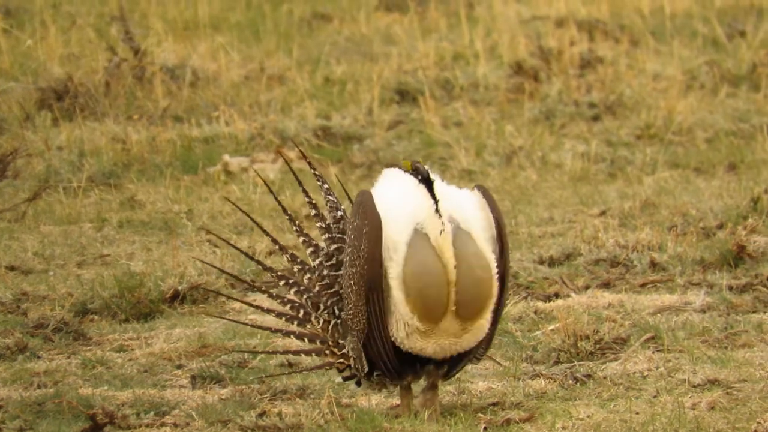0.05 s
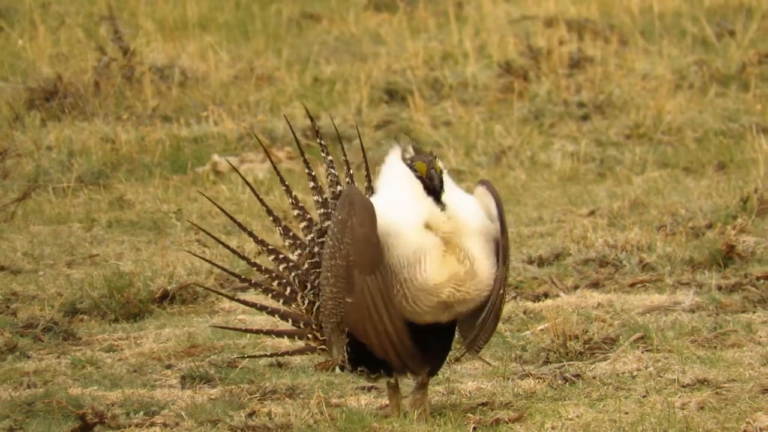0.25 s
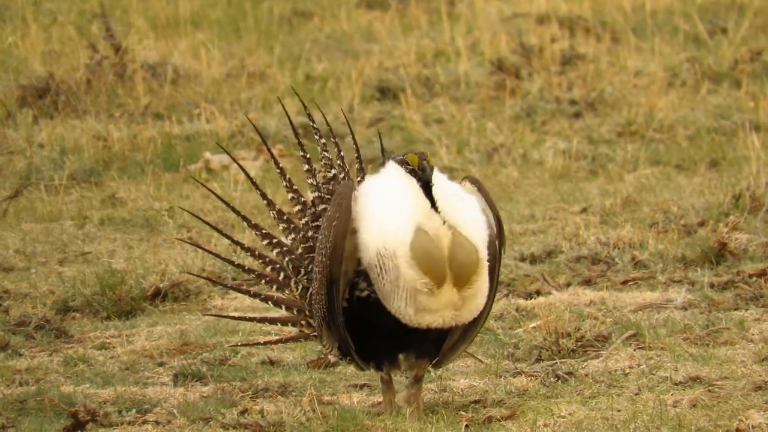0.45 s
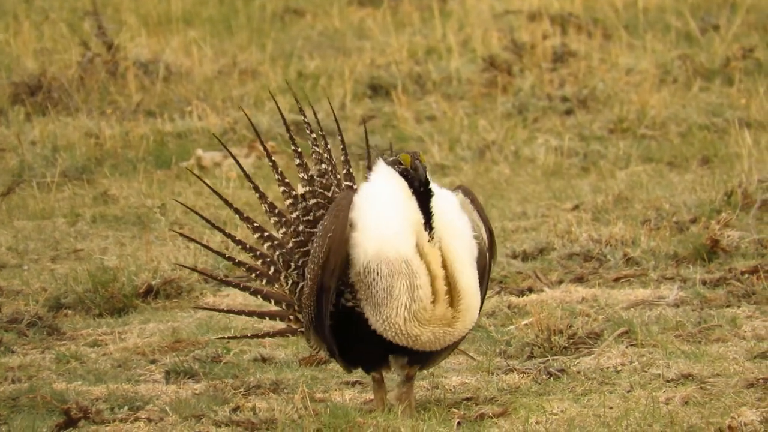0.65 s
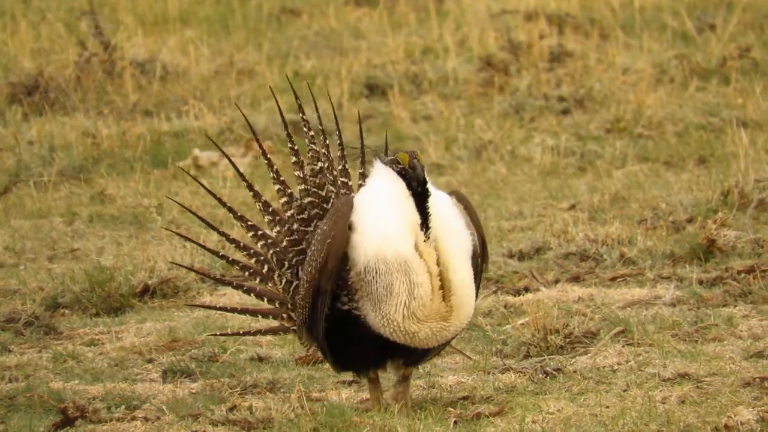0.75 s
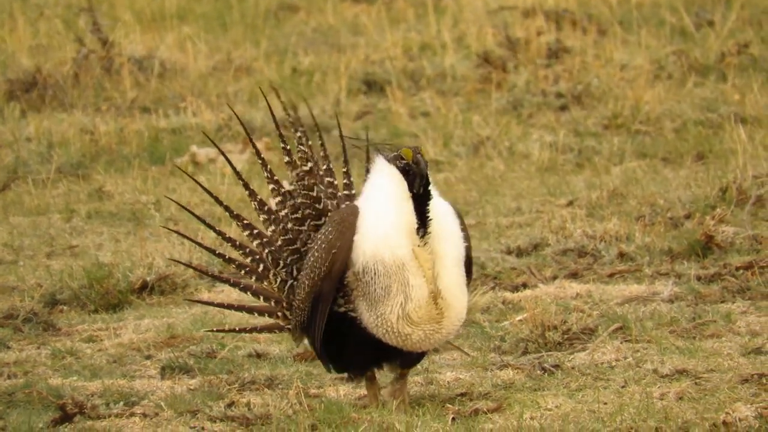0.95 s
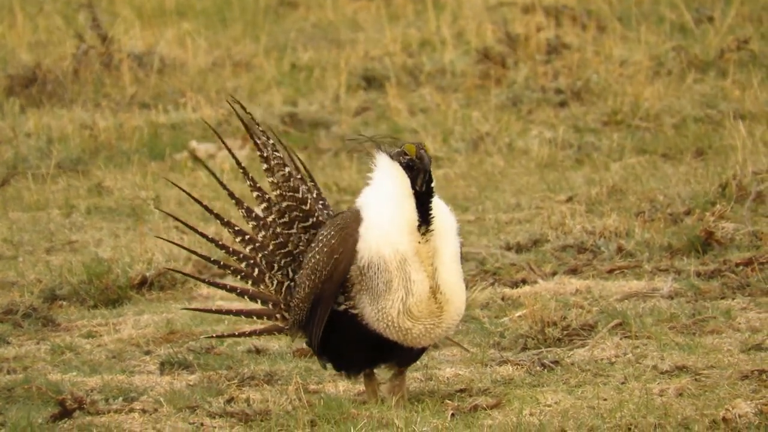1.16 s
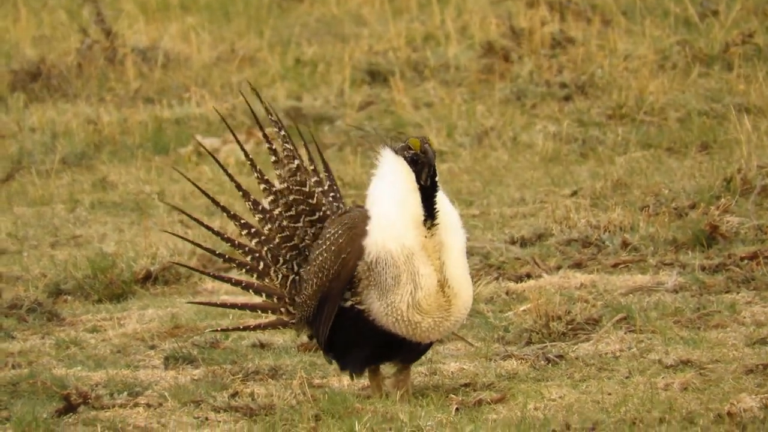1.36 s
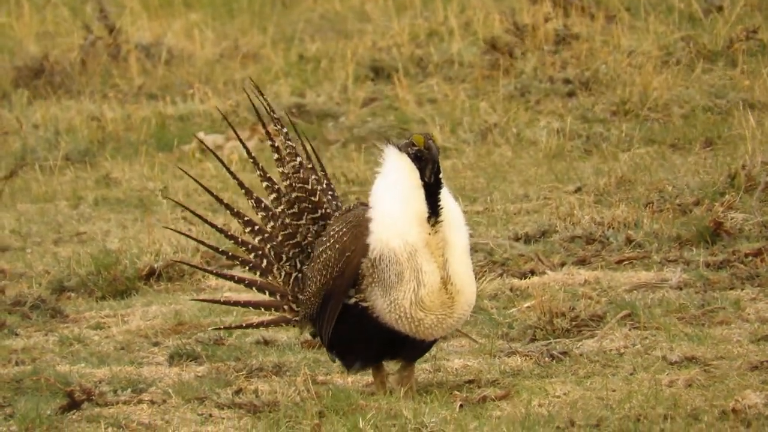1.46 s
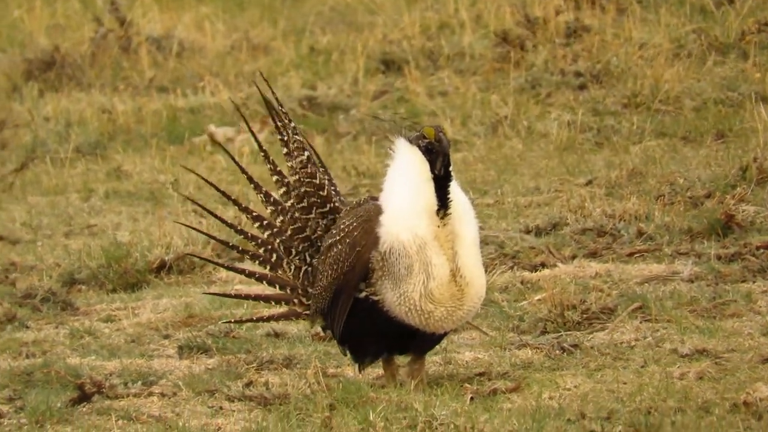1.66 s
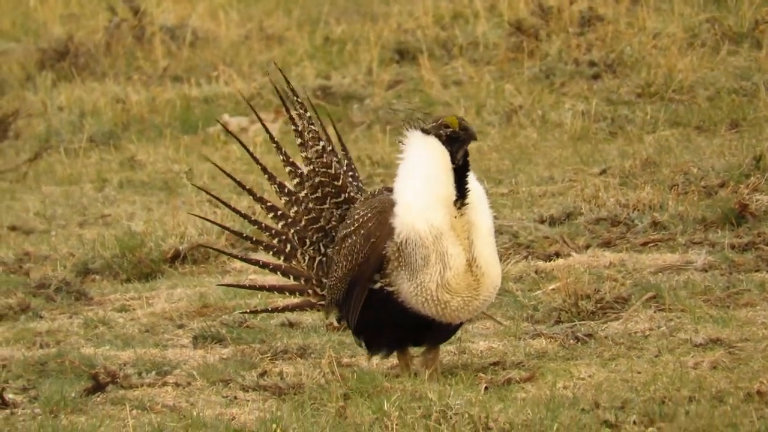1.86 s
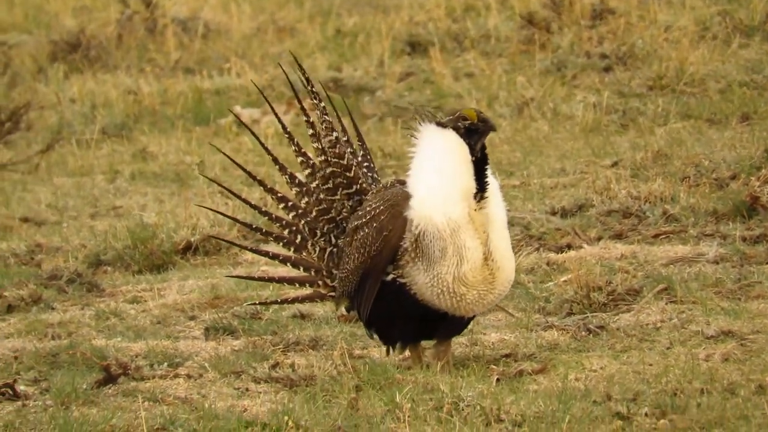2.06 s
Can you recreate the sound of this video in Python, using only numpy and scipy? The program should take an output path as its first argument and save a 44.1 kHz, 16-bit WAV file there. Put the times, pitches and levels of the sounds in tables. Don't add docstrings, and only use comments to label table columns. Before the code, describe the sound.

Wind buffets a small stereo microphone in low, muffled thumps: strong near 0.35 seconds, again around 0.6, roughest with raspy flutter near 1.05, a lull around 1.4 to 1.55, then more gusts at 1.65 and 1.8. Faint distant grouse pops come at 0.02 and 0.22; the near bird pops sharply at 0.44, whistles thinly at 0.5, pops weakly at 0.65. A dry stalk ticks at 1.37 over soft hiss.

```python
import sys
import numpy as np
from scipy import signal
from scipy.fft import rfft, irfft, next_fast_len
from scipy.io import wavfile
from scipy.ndimage import uniform_filter1d

SR = 44100
rng = np.random.default_rng(int(sys.argv[2]) if len(sys.argv) > 2 else 0)


def nominal_scale(level):
    x = np.asarray(level, float) / 20
    return 10 ** x


def store_wav(level_fs):
    pcm = np.round(np.clip(np.atleast_2d(level_fs), -1, 1) * 32767)
    wavfile.write(sys.argv[1], SR, pcm.T.astype(np.int16))


N = 92610


def unit(x):
    return x / np.sqrt(np.mean(x ** 2) + 1e-20)


def coloured(x, points):
    m = next_fast_len(N + 8192) // 2 * 2
    f_hz, level_db = np.transpose(list(points) + [(SR / 2, points[-1][1] - 40)])
    gain_db = np.interp(np.log(np.fft.rfftfreq(m, 1 / SR) + 1), np.log(f_hz), level_db)
    cepstrum = irfft(np.log(nominal_scale(gain_db)), m)
    cepstrum[1:m // 2] *= 2
    cepstrum[m // 2 + 1:] = 0
    return irfft(rfft(x, m) * np.exp(rfft(cepstrum)), m)[..., :N]


def smooth(x, length_s):
    size = max(int(length_s * SR / 2), 1)
    return np.abs(uniform_filter1d(uniform_filter1d(x, size), size))


def bell(s, db, ms):
    return nominal_scale(db) * 0.5 ** ((2000 * (np.arange(N) / SR - s) / ms) ** 2)


def air():
    # f/Hz, level/dB
    air_mid = [(25, -29.5), (70, -12), (200, -17), (500, -4.5), (1300, -12), (2500, -20), (9000, -33.5),
               (13800, -44.5)]
    # f/Hz, level/dB
    air_side = [(60, -38.5), (300, -34), (600, -11.5), (1200, -5), (2500, -3.5), (6000, -9.5), (11000, -19),
                (15000, -23)]
    # f/Hz, width/Hz, level/dB
    hum = [
        (934, 96, -61.5),
        (1618, 130, -69),
        (10370, 300, -85.5),
        (11200, 430, -88.5),
    ]
    air_db, side_db, patch_db = -56, -63.5, 1.62
    z = signal.stft(rng.standard_normal((3, N)), nperseg=512)[2]
    patches = uniform_filter1d(uniform_filter1d(rng.standard_normal(z.shape), 5, 1), 8, 2)
    a, b, c = signal.istft(z * nominal_scale(patch_db * unit(patches)), nperseg=512)[1][:, :N]
    f_hz = np.fft.rfftfreq(N, 1 / SR)
    mid = nominal_scale(air_db) * unit(coloured(a, air_mid))
    for hz, width_hz, db in hum:
        mid = mid + nominal_scale(db) * unit(irfft(rfft(c) * np.exp(-((f_hz - hz) / width_hz) ** 2), N))
    side = nominal_scale(side_db) * unit(coloured(b, air_side))
    return np.array([mid + side, mid - side])


def stalk():
    at_s, level_db, t60_s = 1.3735, -52, 0.02
    t = np.arange(N) / SR - at_s
    bright = [(1500, -17), (4500, 17.5), (8000, 11), (13000, -4)]  # f/Hz, level/dB
    noise = unit(coloured(rng.standard_normal((2, N)), bright))
    return (t > 0) * nominal_scale(level_db - 60 * np.abs(t) / t60_s) * noise


def whistle(later_s, gain_db):
    # t/s, f/Hz, level/dB
    glide = [
        (.482, 1420, -66),
        (.491, 1595, -61),
        (.501, 2010, -60),
        (.509, 2270, -58),
        (.517, 2300, -57),
        (.523, 2020, -56),
        (.531, 1650, -64),
    ]
    t = np.arange(N) / SR - later_s
    s, hz, db = np.transpose(glide)
    on = smooth(1.0 * (t > s[0]) * (t < s[-1]), 0.0049)
    level = np.sqrt(2) * nominal_scale(gain_db + np.interp(t, s, db))
    pitch_hz = smooth(np.interp(t, s, hz), 0.0042)
    return on * level * np.sin(2 * np.pi * np.cumsum(pitch_hz) / SR)


def pops():
    # t/s, peak/dB, snap spacing/ms, brightest f/Hz, left-right/dB
    sacs = [
        (.0218, -40.5, 1.52, 1037, 2),
        (.2215, -50, 0.55, 2470, -7),
        (0.4406, -26.5, 1.016, 2470, 0),
        (0.6481, -42.5, 0.52, 2400, -5),
    ]
    snap_loss_db = 3.5
    scatter_db, scatter_t60_s, scatter_after_s = -11, 0.03, 0.003
    sac_hz, sac_db, sac_t60_s, sac_late_s = 1124, -15, 0.018, 0.00296
    out, t = np.zeros((2, N)), np.arange(2000) / SR
    late = np.abs(t - sac_late_s)
    ring = (t > sac_late_s) * nominal_scale(sac_db - 60 * late / sac_t60_s) * np.sin(2 * np.pi * sac_hz * late)
    decay = nominal_scale(scatter_db - 60 * t / scatter_t60_s) * (t > scatter_after_s)
    for s, db, ms, hz, pan_db in sacs:
        snaps = 0
        for k in range(3):
            since = t - 0.0004 - k * ms / 1000
            pulse = np.exp(-(np.pi * hz * since / 1.5) ** 2) * np.sin(2 * np.pi * hz * since)
            snaps = snaps + nominal_scale(-snap_loss_db * k) * pulse
        scatter = rng.standard_normal(len(t)) + 0.47 * rng.standard_normal((2, len(t)))
        ground = decay * scatter * np.sqrt(hz / SR)
        echo = signal.fftconvolve(snaps[None], ground, axes=1)[:, :len(t)]
        pan = nominal_scale([[pan_db / 2], [-pan_db / 2]])
        out[:, round(s * SR):][:, :len(t)] += nominal_scale(db + 4.5) * pan * (snaps + echo + ring)
    return out


def flutters():
    # t/s, level/dB, length/ms, reach/Hz
    rasps = [(.252, -48.5, 45, 800), (0.333, -42, 27, 900), (0.354, -34.5, 25.7, 1100),
             (0.383, -44, 19, 900), (.565, -45.5, 13, 800), (0.648, -46, 42, 900), (0.797, -46.5, 27, 850),
             (0.943, -42.5, 15, 850), (1.022, -36, 21, 900), (1.053, -25.5, 13, 1560),
             (1.074, -29, 11.8, 1200), (1.138, -39.5, 33, 800), (1.524, -49.5, 25, 1000),
             (1.639, -49, 33, 900), (1.83, -41.5, 28, 1000)]
    low_hz, side_db = 485, -7
    grain_db, grain_s = 5.5, 0.0039
    f_hz, white = np.fft.rfftfreq(N, 1 / SR), rng.standard_normal((3, N))
    grain = unit(uniform_filter1d(white[2], int(grain_s * SR) + 1))
    spectrum = rfft(white[:2] * nominal_scale(grain_db * grain))
    out = 0
    for s, db, ms, reach_hz in rasps:
        cut = np.sqrt((1 + (low_hz / (f_hz + 1)) ** 6) * (1 + (f_hz / reach_hz) ** 14))
        x = irfft(spectrum / cut / (f_hz + 200), N)
        near = bell(s, 0, ms)
        rms = np.sqrt((near * x ** 2).sum(1) / near.sum())[:, None]
        out = out + nominal_scale(db) * near * x / rms
    return out * nominal_scale([[0], [side_db]])


def kicks(spectrum):
    per_s, spread_db, even_s = 260, 6.5, 0.028
    eddy_hz, eddy_q = np.array([142.6, 231.5, 405])[:, None], 1.53
    lead_s = 0.051
    chance, g = rng.random((3, N)), rng.standard_normal((2, 3, N))
    hits = (chance < per_s / 3 / SR) * np.sign(g[0]) * nominal_scale(spread_db * g[1])
    train = hits + 0.0033 * g[0]
    f_hz = np.fft.rfftfreq(N, 1 / SR)
    skirt = 1j * f_hz * eddy_hz
    ringing = skirt / (eddy_hz ** 2 - f_hz ** 2 + skirt / eddy_q)
    x = coloured(irfft(rfft(train) * ringing, N), spectrum)
    mean_power = np.mean(x ** 2, 1)[:, None]
    x = (x * np.sqrt(mean_power / (smooth(x ** 2, lead_s) + 1e-20))).sum(0)
    return x / np.sqrt(smooth(x ** 2, even_s) + 1e-20)


def wind_power():
    # t/s, strength/dB
    breeze = [(.08, -64), (.17, -57), (.22, -42.5), (.38, -24.5), (.49, -53), (.52, -50), (0.561, -45),
              (0.649, -20.5), (.72, -45.5), (.84, -39.5), (.98, -43), (1.16, -32.5), (1.33, -42.5),
              (1.56, -55.5), (1.59, -55), (1.791, -31), (1.92, -45), (2.02, -65.5)]
    # t/s, level/dB, length/ms
    eddies = [(0.128, -31.5, 8.8), (0.212, -39, 29), (0.247, -27, 33), (0.278, -20.5, 17),
              (0.351, -9.5, 19.8), (0.413, -29, 16), (0.467, -26.5, 39.5), (0.576, -19, 20.4),
              (0.621, -18, 18.3), (0.702, -32.5, 10), (0.807, -21, 25.3), (0.885, -29.5, 15),
              (0.932, -23, 39), (1.022, -24, 34.7), (1.051, -11.5, 33), (1.069, -13.5, 27.4),
              (1.103, -16, 11.6), (1.14, -22, 42), (1.187, -41, 36), (1.235, -24.5, 17), (1.273, -40, 80),
              (1.303, -21, 17.4), (1.363, -34.5, 8.3), (1.599, -20, 19), (1.616, -27, 26.6),
              (1.644, -14.5, 20.4), (1.68, -25, 14), (1.745, -27, 42), (1.824, -23, 21), (1.86, -34, 39)]
    s, db = np.transpose(breeze)
    power = nominal_scale(np.interp(np.arange(N) / SR, s, db)) ** 2
    return power + sum(bell(*row) ** 2 for row in eddies)


def grown(power, db, slope):
    loudest_db = -12
    return nominal_scale(loudest_db + db) * (power / nominal_scale(loudest_db) ** 2) ** (slope / 2)


def thumps(power):
    # f/Hz, level/dB
    band = [(25, -41.5), (60, -23), (110, -15), (145, -3), (210, -2), (330, -0.5), (470, -4.5),
            (550, -23.5), (1000, -53)]
    # f/Hz, level/dB
    edge = [(20, -12), (60, 3.5), (490, -1.5), (560, -5.5), (1000, -20.5)]
    x = coloured(np.sqrt(power) * kicks(band), edge)
    return np.roll(x, -int(0.0019 * SR))


def sway(power):
    # f/Hz, level/dB
    bass = [(18, -33.5), (30, -14), (60, 3.5), (100, 12.5), (140, -22)]
    return grown(smooth(power, 0.01), -26.5, 0.51) * unit(coloured(rng.standard_normal(N), bass))


def port_difference(power):
    # f/Hz, level/dB
    apart = [(60, -30.5), (113, -25), (240, -6), (430, -4), (540, -16), (700, -20.5), (1500, -28)]
    # f/Hz, level/dB
    edge_apart = [(30, -16.5), (80, -12), (160, 1.5), (1500, 8), (3000, -10.5)]
    return coloured(grown(power, -21.5, 1.13) * kicks(apart), edge_apart)


def block_seams(power):
    # f/Hz, level/dB
    seam_colour = [(300, -15.5), (1200, 4), (3500, -6), (6500, -16.5), (8500, -33.5)]
    block_s, start_s = 512 / 48000, 0.0081
    block = ((np.arange(N) / SR - start_s) / block_s + 1).astype(int)
    count = block[-1] + 1
    jump = rng.uniform(0.99, 1, count) * rng.choice([-1, 1], count)
    steps = np.diff(block, prepend=0) * jump[block]
    return coloured(steps * grown(smooth(power, 0.02), -2.5, 1), seam_colour)


def wind():
    power = wind_power()
    mid, side = flutters()
    mid = mid + thumps(power) + sway(power)
    side = side + port_difference(power)
    return np.array([mid + side, mid - side + block_seams(power)])


def scene():
    tone = whistle(0, 0) + whistle(-0.418, -8)
    return air() + stalk() + tone * nominal_scale([[-1], [1]]) + pops() + wind()


def band_limit(x):
    return signal.sosfilt(signal.butter(12, 15000, fs=SR, output="sos"), x)


def record(dry):
    ceiling = 0.84
    mix = dry / (1 + np.abs(dry / ceiling) ** 4) ** 0.25
    return band_limit(mix)


dry = scene()
out = record(dry)
store_wav(out)
```